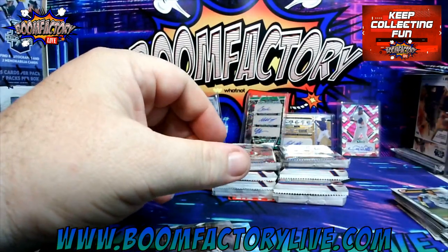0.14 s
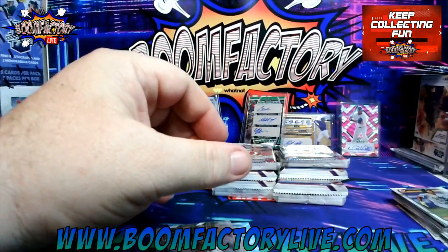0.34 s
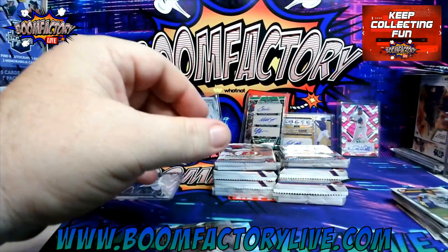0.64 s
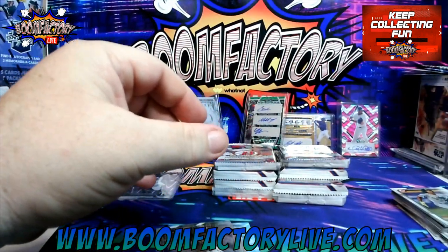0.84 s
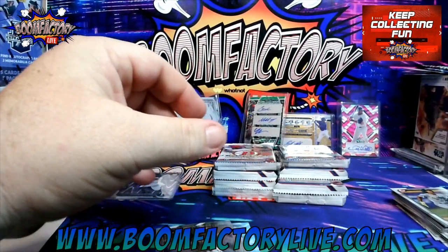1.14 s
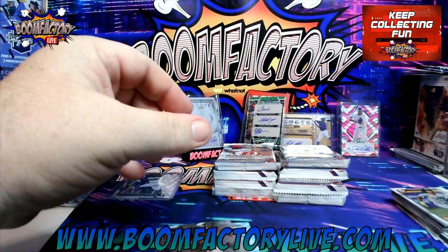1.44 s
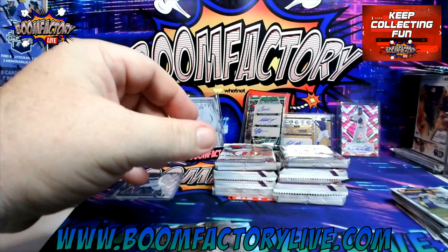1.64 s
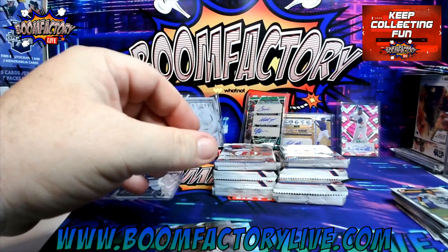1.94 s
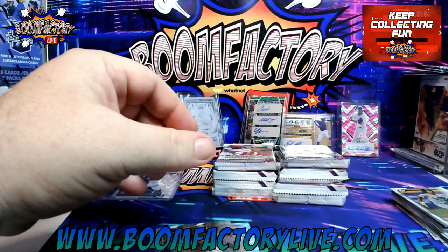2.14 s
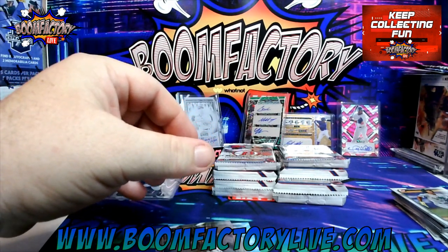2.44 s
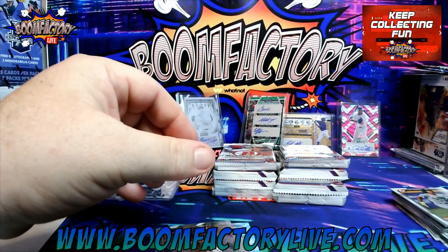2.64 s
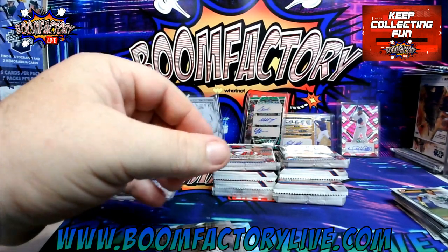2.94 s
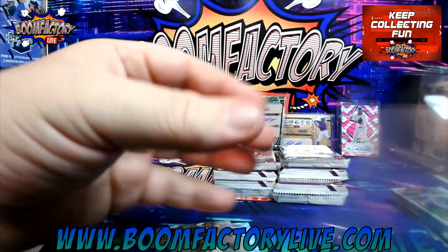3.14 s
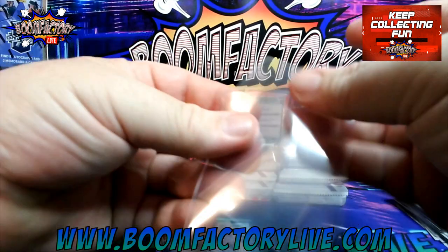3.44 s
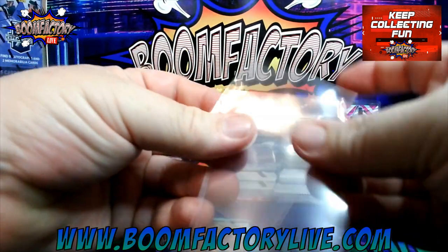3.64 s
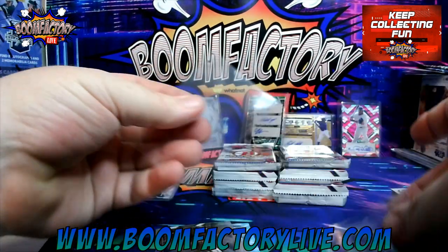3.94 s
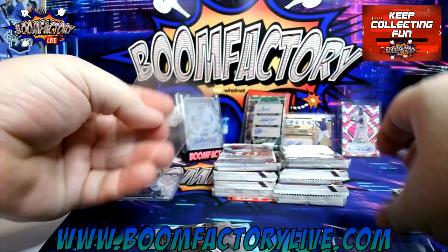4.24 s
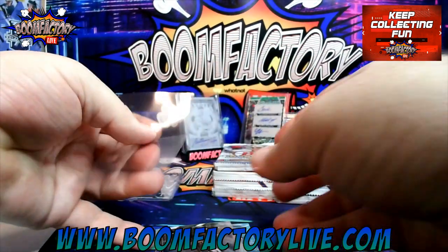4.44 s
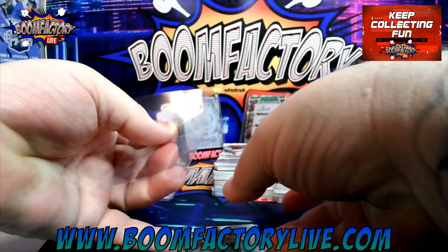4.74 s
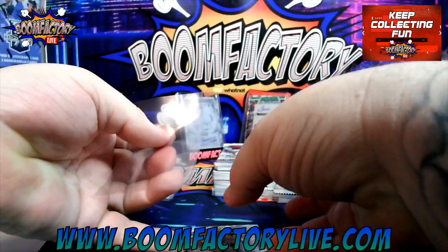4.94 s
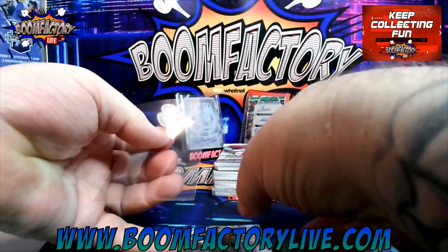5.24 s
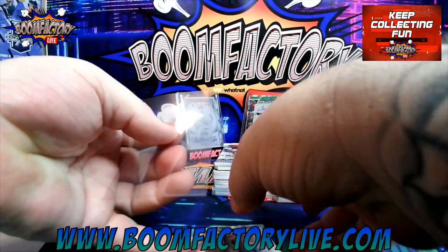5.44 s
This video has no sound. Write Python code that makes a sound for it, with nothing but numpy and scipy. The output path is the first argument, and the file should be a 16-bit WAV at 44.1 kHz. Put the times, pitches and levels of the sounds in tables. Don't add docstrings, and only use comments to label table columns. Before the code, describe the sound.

Close stereo microphones on a table in a quiet room. Hands tug thin plastic sleeves from a pack, making dense, bright crackles and sharp snaps in uneven clusters for almost three seconds. Then a single sleeve is handled more softly, with airy hisses and one hard click near the middle of that second part. Dull arm bumps and low rubbing come through the table.

```python
import sys
import numpy as np
from scipy import signal
from scipy.io import wavfile
from scipy.ndimage import uniform_filter1d

SR = 44100
rng = np.random.default_rng(int(sys.argv[2]) if len(sys.argv) > 2 else 0)


def output_pcm(signal):
    pcm = np.clip(np.atleast_2d(signal).T, -1, 1) * 32767
    wavfile.write(sys.argv[1], SR, np.round(pcm).astype(np.int16))


def gain_from_decibels(decibels):
    exponent = np.asarray(decibels, float) / 20
    return 10 ** exponent


N = 246519


def evened(x):
    return x / np.sqrt(np.mean(x ** 2) + 1e-20)


def smoothed_twice(x, size):
    return uniform_filter1d(uniform_filter1d(x, size=size), size=size)


def read(points, hz):
    f, value = np.transpose(points)
    return np.interp(np.log(hz + 1), np.log(f + 1), value)


def add(mix, s, sound):
    part = mix[max(round(s * SR), 0):][:len(sound)]
    part += sound[:len(part)]


def mode(x, hz, width_hz):
    return signal.lfilter(*signal.iirpeak(hz, hz / width_hz, SR), x)


def even_modes(x, table):
    return sum(gain_from_decibels(db) * evened(mode(x, hz, width_hz)) for hz, width_hz, db in table)


def strokes(rows, column, steepness=1):
    span_db = 20
    t = np.arange(0, N, 32) / SR
    rows = np.array(rows)[:, :, None]
    peak_s, rise_s, fall_s = rows[:, 0], abs(rows[:, 1]), abs(rows[:, 2])
    away = np.maximum((peak_s - t) / rise_s, (t - peak_s) / fall_s)
    power = (gain_from_decibels(rows[:, column] - steepness * span_db * away) ** 2).sum(0)
    return np.interp(np.arange(N) / SR, t, power)


# f/Hz, level/dB per Hz
ROOM = [(12, -24), (20, 45), (70, -20), (123, -32), (172, 0), (660, -9.5), (1290, -17.5), (4300, -14),
        (6180, -17), (8890, -17), (13500, -16), (14700, -16), (16000, -85)]
# f/Hz, left-right likeness/0-1
SAME = [(60, 0.89), (300, 0.83), (700, 0.2), (1500, 0.042), (4000, 0.011)]


def room_noise(patchy_db=1.1):
    frames, hz = N // 256 + 5, np.fft.rfftfreq(1024, 1 / SR)
    a, b, c, d, patches = rng.standard_normal((frames, 513, 5)).T
    patches = uniform_filter1d(patches, size=8, axis=0)
    patches = evened(uniform_filter1d(patches, size=14, axis=1))
    same = np.clip(read(SAME, hz), -1, 1)[:, None]
    left = a + 1j * b
    right = same * left + np.sqrt(1 - same ** 2) * (c + 1j * d)
    z = np.array([left, right])
    z *= gain_from_decibels(read(ROOM, hz)[:, None] + patchy_db * patches)
    noise = signal.istft(z, nperseg=1024, noverlap=768)[1][:, :N]
    return gain_from_decibels(-59) * evened(noise)


HUM_HZ = [120, 143, 13899, 8333]
# width/Hz, level/dB, waver depth/1
HUM = [(13.8, -62, 1.5), (24, -84, 0.49), (3.1, -72, 0.28), (7.8, -76, 0.45)]


def hum():
    out = np.zeros(N)
    for line_hz, (width_hz, db, depth) in zip(HUM_HZ, HUM):
        r = np.exp(-np.pi * width_hz / SR)
        noise = rng.standard_normal(N) + 1j * rng.standard_normal(N)
        waver = signal.lfilter([1], [1, -2 * r, r * r], noise)
        carrier = np.exp(2j * np.pi * line_hz * np.arange(N) / SR)
        tone = (1 + depth * waver / np.std(waver)) * carrier
        out += gain_from_decibels(db) * evened(tone.real)
    return out


# t/s, peak level/dB, f/Hz
THUMPS = [(0.602, -31.5, 61.6), (0.658, -38, 79), (0.997, -42, 54), (1.322, -42, 103), (1.361, -36.5, 110),
          (1.452, -40.5, 73), (1.896, -47, 142), (2.151, -37.5, 83), (2.232, -49, 111), (2.259, -48, 104),
          (2.342, -52, 83.5), (2.516, -43, 92), (2.624, -50, 88), (2.8, -45.5, 86), (3.237, -43, 116),
          (3.472, -46, 60), (3.496, -40, 107), (4.158, -46, 108), (4.241, -35, 106), (4.392, -35, 81),
          (4.421, -53, 100), (4.518, -46, 86.5), (4.542, -45, 98), (4.895, -32, 106), (5.114, -39, 102),
          (5.239, -42.5, 93), (5.349, -44, 112), (5.397, -37.5, 60)]


def thumps(turns=.8):
    out = np.zeros(N)
    for s, db, hz in THUMPS:
        cycles = np.arange(round(6 * SR / hz)) * hz / SR
        age = cycles / turns * 2
        shape = age * np.exp(1 - age)
        add(out, s - turns / hz / 2, gain_from_decibels(db) * shape * np.sin(2 * np.pi * cycles))
    return out * gain_from_decibels(np.array([[-1.1], [1.1]]))


# f/Hz, width/Hz, level/dB
TABLE = [(26.8, 22, 11.5), (120, 28, 9), (228, 29, 2), (450, 97, -6), (635, 14, -8.5), (760, 1100, -26)]
# peak t/s, rise/s, fall/s, hiss level/dB, drag level/dB
PULLS = [(.1, 0.33, 0.2, -55, -57.5), (.5, 0.75, 0.29, -58, -72), (.612, 0.018, 0.16, -46, -47.5),
         (.67, 0.049, 0.086, -39, -68), (.855, 0.11, 0.09, -64, -56.5), (1.0, 0.025, 0.065, -33.5, -45),
         (1.092, 0.044, 0.18, -41, -59.5), (1.2, 0.35, 0.075, -46, -56.5), (1.25, 0.03, 0.064, -45.5, -55),
         (1.334, 0.035, 0.082, -42.5, -47), (1.405, 0.054, 0.17, -46.5, -50.5),
         (1.455, 0.02, 0.067, -48, -53), (1.528, 0.051, 0.13, -46, -55.5), (1.728, 0.028, 0.077, -37, -54),
         (1.59, 0.041, 0.083, -49.5, -54.5), (1.78, 0.066, .05, -43.5, -63),
         (1.842, 0.058, 0.072, -42, -53), (1.882, 0.093, 0.073, -41.5, -49), (1.92, .05, 0.064, -47.5, -63),
         (2.06, 0.34, 0.08, -53.5, -65), (2.167, 0.13, 0.26, -49, -50), (2.36, 0.044, 0.063, -35, -48.5),
         (2.479, 0.074, 0.065, -42, -49.5), (2.614, 0.051, 0.2, -58, -58), (2.66, 0.045, .08, -50, -72),
         (2.865, .05, 0.076, -52, -60), (2.735, 0.16, 0.14, -43.5, -70), (2.815, 0.25, 0.07, -46, -58)]
# peak t/s, rise/s, fall/s, hiss level/dB, drag level/dB
SLIDES = [(3.009, 0.08, 0.069, -46, -62.5), (3.2, 0.095, .1, -57.5, -64), (3.245, 0.095, 0.082, -49.5, -58),
          (3.325, 0.07, 0.051, -55.5, -58), (3.43, 0.027, .08, -49.5, -60), (3.46, 0.045, 0.16, -50, -52),
          (3.576, 0.19, 0.16, -42, -58), (3.74, 0.042, 0.019, -35.5, -56.5), (3.82, 0.11, 0.14, -44, -61),
          (3.9, 0.51, 0.24, -46, -63), (4.137, 0.065, 0.029, -45.5, -55), (4.238, 0.41, 0.034, -45.5, -60),
          (4.34, 0.18, 0.23, -53, -62), (4.46, 0.32, 0.42, -53.5, -59.5), (4.904, 0.032, 0.073, -47, -52),
          (4.945, .1, 0.046, -48, -57.5), (5.0, 0.019, 0.056, -51, -67), (5.172, 0.01, 0.45, -49.5, -53.5),
          (5.39, 0.19, 0.023, -45.5, -54.5), (5.488, 0.043, 0.094, -55, -58),
          (5.585, 0.067, .1, -55.5, -65)]


def drag(apart=0.49, grain_db=2.5):
    shake = rng.standard_normal((3, N))
    grain = evened(uniform_filter1d(rng.standard_normal(N), size=400))
    shake = (shake[0] + apart * shake[1:]) * gain_from_decibels(grain_db * grain)
    modes = even_modes(shake, TABLE)
    power = strokes(PULLS + SLIDES, column=4) + gain_from_decibels(-67) ** 2
    return evened(modes) * np.sqrt(power) * gain_from_decibels(2.0)


# f/Hz, width/Hz, level/dB
MAT = [(490, 24, 6), (613, 10, 0.5), (303, 89, 11), (900, 360, -35)]
# peak t/s, rise/s, fall/s, level/dB
SCUFFS = [
    (3.24, 0.045, 0.39, -62),
    (3.5, 0.089, 0.082, -54),
    (4.15, 0.056, .08, -60),
    (4.37, 0.07, 0.26, -58),
    (4.54, 0.26, 0.055, -59.5),
    (5.19, 0.048, 0.31, -63),
    (5.3, 0.23, 0.21, -66),
    (5.39, 0.1, 0.088, -52),
]


def scuff(apart=0.33, grain_db=4.5):
    judder = rng.standard_normal((4, N))
    grain = evened(uniform_filter1d(judder[3], size=500))
    push = (judder[0] + apart * judder[1:3]) * gain_from_decibels(grain_db * grain)
    modes = even_modes(push, MAT)
    return evened(modes) * np.sqrt(strokes(SCUFFS, column=3))


# t/s, peak level/dB, f/Hz
TAPS = [(3.219, -43, 635), (3.447, -46, 670), (3.466, -43.5, 610), (3.475, -33, 1810),
        (3.4901, -28.5, 1100), (3.49, -14.5, 3560), (3.524, -44.5, 1830), (3.765, -40, 2300),
        (3.833, -37.5, 1970), (4.154, -51, 704), (4.234, -46, 1870), (4.818, -59, 900), (4.848, -55, 780),
        (4.892, -42, 1530)]


def taps(contact_ms=0.45, cycles=1.0):
    t, out = np.arange(600) / SR, np.zeros(N)
    touch = rng.standard_normal((len(TAPS), 600)) * np.exp(-t * 1000 / contact_ms)
    for (s, db, hz), push in zip(TAPS, touch):
        response = t * np.exp(-2 * t * hz / cycles) * np.sin(2 * np.pi * hz * t)
        ring = np.convolve(push, response)
        add(out, s, gain_from_decibels(db) * ring / abs(ring).max())
    return out


def echoes(x, t60=0.066, first_ms=0.95):
    at = np.arange(0, 8000, 20) + rng.integers(0, 20, (2, 400))
    returns = np.zeros((2, 8020))
    np.put_along_axis(returns, at, rng.choice([-1., 1.], at.shape), 1)
    t = np.arange(8020) / SR
    returns *= gain_from_decibels(-60 * t / t60) * np.clip(t * 1000 - first_ms, 0, 1)
    return signal.fftconvolve(x, returns / np.linalg.norm(returns[0]), axes=1)[:, :N]


def knock(film):
    modes = ((470, 190, -4.0), (651, 38, 3), (1100, 120, -5.5))  # f/Hz, width/Hz, level/dB
    return sum(gain_from_decibels(db) * mode(film, hz, width_hz) for hz, width_hz, db in modes)


# f/Hz, level/dB per Hz
FILM = [(300, -29.5), (450, -20), (800, -27), (1500, -21.5), (2200, -15.5), (2800, -17.5), (3550, -9.5),
        (4250, -17.5), (5100, -6.5), (6800, 1.5), (8900, -11.5), (11000, -8.5), (12700, -5), (14000, -9.5),
        (15100, -30), (16600, -44)]
# lower f/Hz, upper f/Hz
BANDS = [(4200, 9200), (500, 4200), (9200, 16500)]


def film_parts(x):
    log_gain = np.log(gain_from_decibels(read(FILM, abs(np.fft.fftfreq(2048, 1 / SR)))))
    response = np.fft.ifft(np.exp(np.conj(signal.hilbert(log_gain)))).real[:512]
    response = response.reshape((1,) * (x.ndim - 1) + (-1,))
    coloured = signal.oaconvolve(x, response, axes=-1)[..., :x.shape[-1]]
    filters = [signal.butter(4, band, "bandpass", fs=SR, output="sos") for band in BANDS]
    return [signal.sosfilt(sos, coloured) for sos in filters]


# t/s, left microphone late by/ms, left-right likeness/0-1, creased share/0-1
PLACE = [(0, .05, .1, .6), (.56, .08, .1, .6), (.62, .165, .68, .9), (2.55, .165, .68, .9),
         (2.63, .14, .5, .7), (2.8, .165, .55, .7), (3.05, .15, .45, .5), (3.2, .03, .3, .6),
         (3.5, .04, .2, .4), (3.77, .07, .2, .3), (3.81, -.115, .85, .3), (3.93, -.115, .75, .4),
         (4.05, -.05, .45, .45), (4.6, -.04, .3, .4), (4.88, .07, .35, .4), (5.59, .07, .25, .4)]
# pack level/dB, lone sleeve level/dB
LEAN = [(0, -1.5), (-3, -1.5), (-.5, 2)]
# t/s, peak level/dB, deep level/dB re peak, fine level/dB
PACK_SNAPS = [(0.612, -35, -5, -16), (0.6312, -37, 0, -19.0), (0.64, -34.5, 0, -25),
              (0.6619, -18.5, -8, -16), (0.6695, -23.5, -8.5, -4), (0.672, -31, -4, -11.0),
              (0.6758, -26, -17, -11.0), (0.682, -33, -20, -22), (0.6911, -29, -5, -26),
              (0.7058, -33, -21, -28), (0.744, -33, -5, -9.5), (0.8173, -43.5, -1.5, -16),
              (0.8488, -32.5, -17, -23), (0.9688, -37.5, -14, -5), (0.9719, -37, 6, -13),
              (0.9779, -35, -4, -16), (0.9863, -29.5, -3.5, -18.0), (0.99, -28, -6, -17.0),
              (0.9936, -23, -9, -26), (0.9975, -31, -12, -24), (1.0004, -19, -24, -27),
              (1.0025, -14, -13, -15), (1.0127, -29.0, -14, -17.0), (1.0152, -29, -12, -18.0),
              (1.0368, -30, -4.5, -25), (1.0708, -30, -8, -7), (1.0821, -21.5, -28, -27),
              (1.0885, -23, -22, -19), (1.093, -21.5, -15, -28), (1.117, -24, -7.5, -27),
              (1.1207, -20.5, -6, -28), (1.1336, -32, -11, -25), (1.1441, -27, -9, -27),
              (1.1545, -25.5, -6.5, -16), (1.1581, -26, -17, -19), (1.1801, -37, 3, -17.0),
              (1.1855, -33, -2.5, -10), (1.191, -33, -4, -9), (1.2114, -30.5, -19, -22),
              (1.2213, -33.0, -4, -13.0), (1.2402, -32, -9, -23), (1.2438, -28.5, -1, -20),
              (1.2461, -42, -3, -4),
              (1.317, -39.5, 3, -23), (1.3278, -32, -14, -14.0), (1.334, -30, -11.0, -10),
             (1.3431, -37, -1, -18), (1.3855, -39, 2, -23), (1.3898, -34, -23, -20),
             (1.3931, -21, -24, -18), (1.397, -15, -42, -18), (1.4042, -22.0, -37, -14),
             (1.4304, -22.5, -29, -13), (1.4503, -26, -9, -11.5), (1.4537, -23, -16.0, -20),
             (1.503, -37.5, 3, -20), (1.511, -36.0, -2, -20), (1.5152, -30, -10, -15),
             (1.524, -23.5, -9, -16), (1.5287, -23.5, -7, -12), (1.5486, -14, -19, -20.0),
             (1.552, -28, -1, -21), (1.5593, -34, -25, -24.0), (1.587, -40, -23.0, -10),
             (1.5912, -29, -11, -8.5), (1.7141, -33, 4, -12), (1.7258, -31, -11, -21),
             (1.7307, -28.5, -4.5, -18), (1.744, -30, -5, -11), (1.7533, -26, -15, -19),
             (1.7557, -23.5, -5, -21.0), (1.7622, -18.5, -25, -27.0), (1.7764, -31, -3, -16.0),
             (1.7787, -27, -4, -11), (1.7814, -37, -13, -17.0), (1.7958, -17.5, -19, -37),
             (1.7987, -37, -16, -17), (1.8059, -42, -16, -16), (1.8227, -31, -20, -19),
             (1.8329, -36, -3, -22), (1.8443, -31, -16, -20), (1.8364, -39, -13, -6.0),
             (1.8697, -16, -40, -19), (1.875, -24, -17, -10), (1.887, -9.5, -9, -14),
             (1.8872, -16, -20, -17), (1.9181, -41, 4, -18), (1.932, -43, -8, -18), (1.966, -38, 3.5, -12),
             (1.997, -44, -2, -19.0), (2.0057, -40.5, -1, -21.0), (2.0087, -41, -5, -19),
              (2.023, -37.5, -1, -15), (2.0831, -45, -1, -23), (2.1225, -51, -7, 2),
              (2.1347, -31, -16, -21), (2.1374, -25.5, -3.5, -18), (2.1483, -34, -4, -11),
              (2.1605, -31, -15, -21), (2.1635, -31.5, 0.5, -15), (2.1677, -30, -17, -14),
              (2.1774, -37, -9, -19), (2.2053, -22.5, -6, -20), (2.2081, -40, 4, -18),
              (2.2311, -36, 0, -16), (2.236, -40, 7, -20), (2.2666, -29, -5.5, -18), (2.27, -36.5, -1, -21),
              (2.3273, -29.5, -2, -24), (2.335, -16.5, -10.5, -22), (2.3386, -28, -13, -22),
              (2.343, -28.5, 0.5, -28), (2.3538, -22, -16, -16), (2.359, -24, -9, -18),
              (2.3637, -31, -22, -14), (2.3725, -23, -4, -5.5), (2.3764, -35, -11, -8),
              (2.3957, -39, -17, -12), (2.4032, -37, -5, -13), (2.4124, -31, -4, -14),
              (2.4358, -33, -15, -16), (2.441, -31.5, 2, -7), (2.4484, -24.5, -6.5, -20),
              (2.4558, -41, 4, -16), (2.458, -35, -17, -19), (2.4687, -29, -23, -13),
              (2.473, -36, -17, -14), (2.4839, -32, -15, -17), (2.487, -37, -20, -11),
              (2.5102, -29, -18, -26), (2.5227, -38, -5, -20), (2.6036, -41, -6, -11),
              (2.616, -37, -2, -12), (2.618, -40, -5, -6), (2.7284, -33, -19, -28), (2.7401, -39, -17, -29),
              (2.7785, -39, 0, -24), (2.807, -30, -17, -22), (2.8097, -36, -0.5, -16),
              (2.8316, -48, -18, 3), (2.8843, -37.5, -26, -7)]
# t/s, peak level/dB, deep level/dB re peak, fine level/dB re peak
OPEN_SNAPS = [(3.183, -35, -33, -10), (3.191, -34, -21, 1), (3.194, -36, -34, -5), (3.2217, -39.5, 3, -4),
              (3.2263, -45, 6, -12), (3.4269, -39, -11, -19), (3.439, -38, -14, -16), (3.4763, -39, -14, 3),
              (3.5663, -41, -12, -1), (3.232, -37, -8, -9), (3.243, -39.5, -3.5, -11),
              (3.447, -40, -8, -18), (3.4664, -35.5, -3, -6), (3.4893, -6, -17, -14),
              (3.4998, -41, -17, -15), (3.7135, -44.5, 3.5, 3), (3.728, -39, -5, -14),
              (3.7426, -24, -23, -29), (3.745, -35, -17, -17), (3.747, -39, -6, -12),
              (3.8341, -40, 12, -16), (3.906, -39.5, -3, -10), (4.0932, -39, -22, -10),
              (4.1203, -36.5, -28, -16), (4.1298, -44, -29, -18), (4.138, -36, -27, -2),
              (4.187, -35, -25, -18), (4.9395, -45, -20, -19), (5.3926, -41, -11, -22),
              (4.145, -38, -31, -23), (4.8923, -45, 10.5, -7)]


def snaps(fall_ms=.5, creep_db=-30, ring_db=-19):
    s, peak_db, deep_db, fine_db = np.transpose(PACK_SNAPS + OPEN_SNAPS)
    s = s + .0007
    lead = 150
    t = (np.arange(800) - lead) / SR
    draw = rng.standard_normal((len(s), 3, 802))

    hard_db, soft_db, soft_rise_ms = -12, -30, .45
    soft = np.clip((peak_db - hard_db) / (soft_db - hard_db), .05, 1)[:, None, None]
    give = np.exp(-abs(t) * 1000 / (soft_rise_ms * soft)) * soft
    creep = gain_from_decibels(creep_db) * soft * np.exp(-abs(t) / .0012)
    fall = fall_ms / 1000 * np.exp(.3 * draw[:, :1, -1:])
    after = np.exp(-abs(t) / fall) + gain_from_decibels(ring_db) * np.exp(-abs(t) / .002)
    shape = np.where(t < 0, give + creep, after)

    cracks = (draw[:, :1, :-2] + (.3 + .25 * soft) * draw[:, 1:, :-2]) * shape
    cracks += (1.6 - .8 * soft) * (t == 0) * np.sign(draw[:, 1:2, -1:])

    burst = 0
    levels_db = (0 * s + 1, deep_db + 0.5, fine_db + 8.0)
    for part, db, (lean_db, _) in zip(film_parts(cracks), levels_db, LEAN):
        top = np.sqrt(2 * uniform_filter1d(part ** 2, size=30).max(2, keepdims=True))
        side_db = lean_db * np.array([[.5], [-.5]])
        burst = burst + part / top * gain_from_decibels((peak_db + db)[:, None, None] + side_db)
    edge = signal.sosfilt(signal.butter(6, 14600, "highpass", fs=SR, output="sos"), cracks)
    burst = burst + edge * gain_from_decibels(peak_db + fine_db - 9.5)[:, None, None]

    late_ms = np.interp(s, *np.transpose(PLACE)[:2])
    pan_db = draw[:, 0, -2] - .5
    out = np.zeros((2, N))
    for k in range(len(s)):
        start = s[k] - lead / SR
        add(out[0], start + late_ms[k] / 1000, burst[k, 0] * gain_from_decibels(pan_db[k] / 2))
        add(out[1], start, burst[k, 1] * gain_from_decibels(-pan_db[k] / 2))
    return out


# peak t/s, rise/s, fall/s, level/dB
SKIMS = [
    (1.42, .03, .04, -44),
    (2.872, 0.062, .06, -47),
    (3.02, 0.084, 0.046, -47),
    (3.585, 0.07, 0.082, -46),
    (3.68, .06, 0.049, -49),
    (4.73, 0.065, .08, -69),
    (5.2, 0.037, 0.1, -53),
]


def rub(slips_per_s=1300, spread_db=2.5, flicker_db=4.0, deep_grain=0.58):
    n = np.arange(N)
    at_s, *columns = np.transpose(PLACE)
    late_ms, same, creased = (np.interp(n / SR, at_s, column) for column in columns)
    chance, size, hiss = rng.random(N), rng.exponential(1, N), rng.standard_normal((4, N))
    slip_size = gain_from_decibels(spread_db * np.minimum(size, 3)) * np.sign(hiss[3])
    slips = evened((chance < slips_per_s / SR) * slip_size)
    wander = evened(smoothed_twice(rng.standard_normal(N), 300))
    spot = evened(smoothed_twice(rng.standard_normal(N), 2000))

    delay_ms = late_ms + .025 * creased ** 2 * spot
    late = np.clip(n - np.round(delay_ms / 1000 * SR).astype(int), 0, N - 1)
    grain = creased * np.clip([[1], [deep_grain]], 0, 1)
    shared = np.sqrt(grain) * slips + np.sqrt(1 - grain) * hiss[0]
    both_sides = np.stack([shared[:, late], shared], axis=1)
    own = np.diff(hiss[1:3], prepend=0)
    drive = np.sqrt(same) * both_sides + np.sqrt((1 - same) / 2) * own
    flicker = gain_from_decibels(flicker_db * grain[:, None] * np.minimum(wander, 1.2))
    middle, deep, fine = film_parts(drive * flicker)

    pocket = mode(middle[0], 6150, 450)
    opened = np.clip((n / SR - 4.3) / .2, 0, 1) * [[.5], [1]]
    sung = evened(middle[0]) + gain_from_decibels(-2) * evened(pocket) * opened

    pack = strokes(PULLS, 3) + gain_from_decibels(-96) ** 2
    lone = strokes(SLIDES, 3)
    skim = (0, 0, strokes(SKIMS, column=3))
    shares_db = ((0, 0), (-4, -13), (-8, -6.5))
    sides = np.array([[1], [-1]])
    out = 0
    parts = (sung, evened(deep[1]), evened(fine[0]))
    for part, (pack_db, lone_db), (pack_lean, lone_lean), extra in zip(parts, shares_db, LEAN, skim):
        pack_power = pack * gain_from_decibels(2 * pack_db + pack_lean * sides)
        lone_power = lone * gain_from_decibels(2 * lone_db + lone_lean * sides)
        out = out + part * np.sqrt(pack_power + lone_power + extra)
    return out


def scene():
    film = snaps() + taps() * gain_from_decibels(np.array([[-1.5], [1.5]]))
    wet = gain_from_decibels(-15) * echoes(film)
    background = room_noise() + hum() + thumps() + drag() + scuff()
    return background + film + wet + knock(film) + rub()


def roll_off(x):
    return signal.sosfilt(signal.butter(12, 16500, fs=SR, output="sos"), x)


def record(dry):
    rounded = 1.1 * np.tanh(dry / 1.1)
    return roll_off(rounded)


dry = scene()
out = record(dry)
output_pcm(out)
```